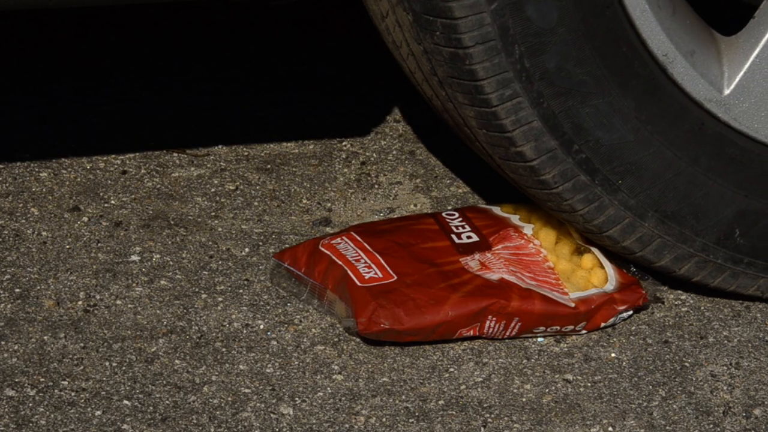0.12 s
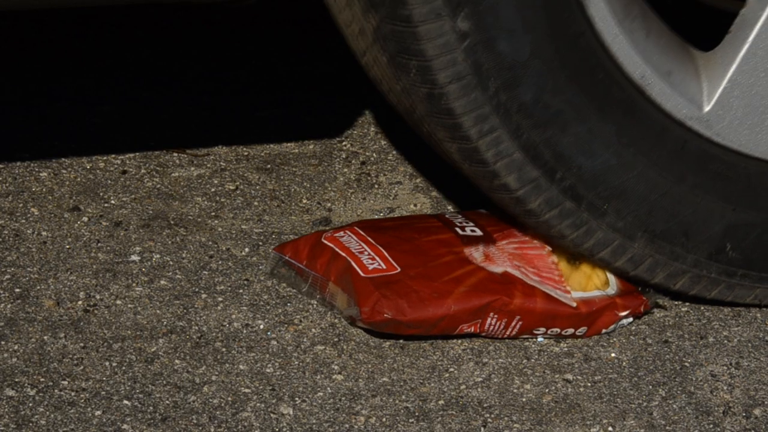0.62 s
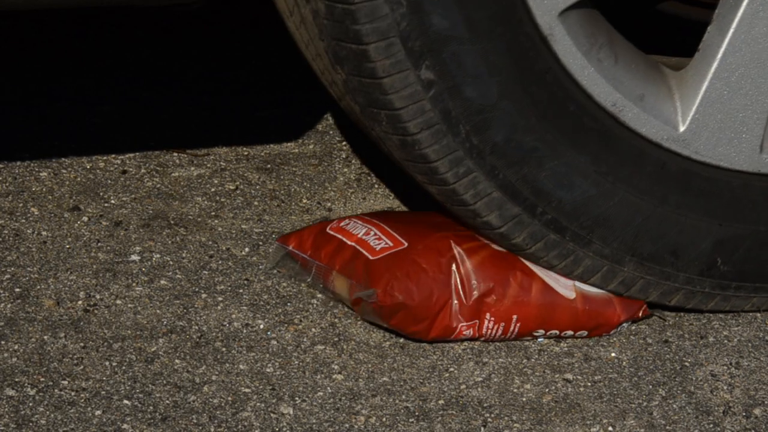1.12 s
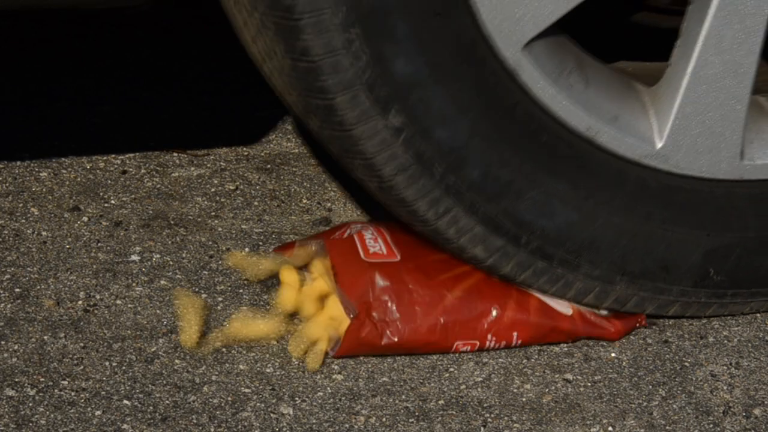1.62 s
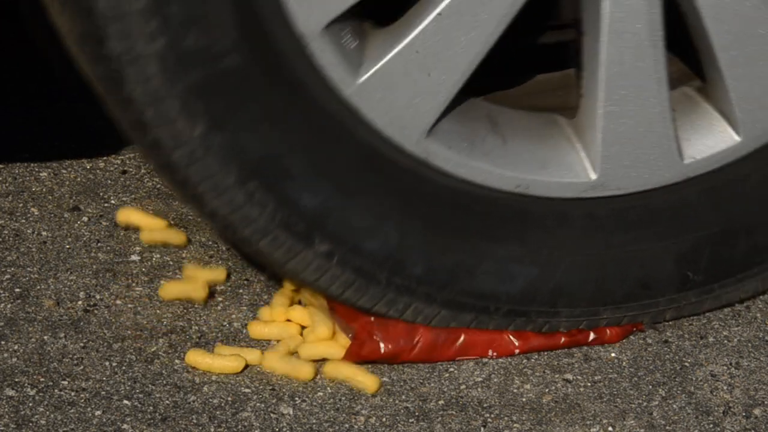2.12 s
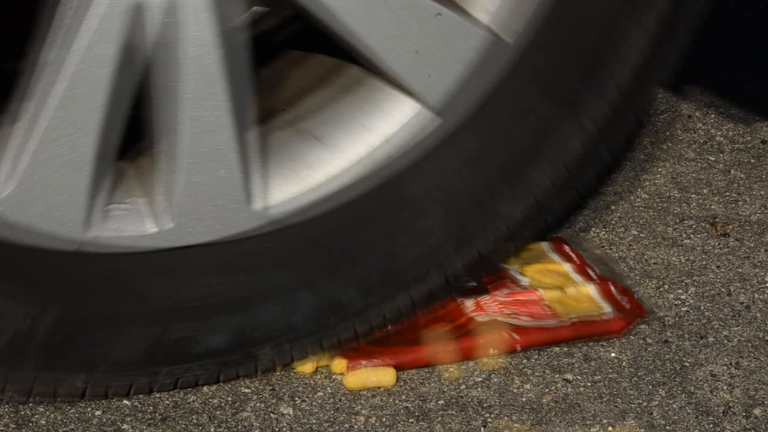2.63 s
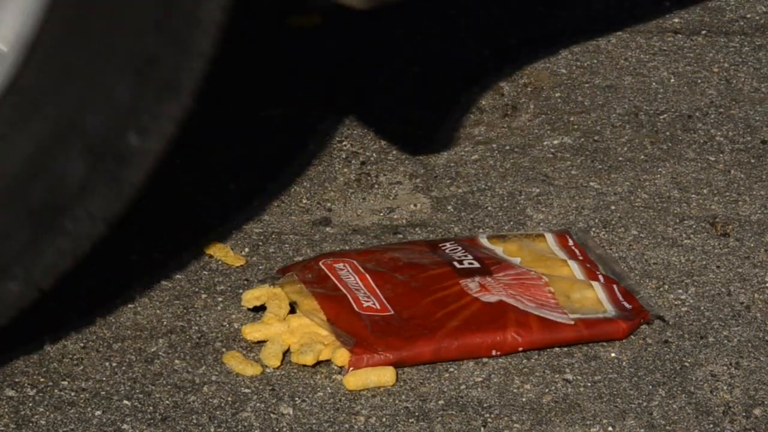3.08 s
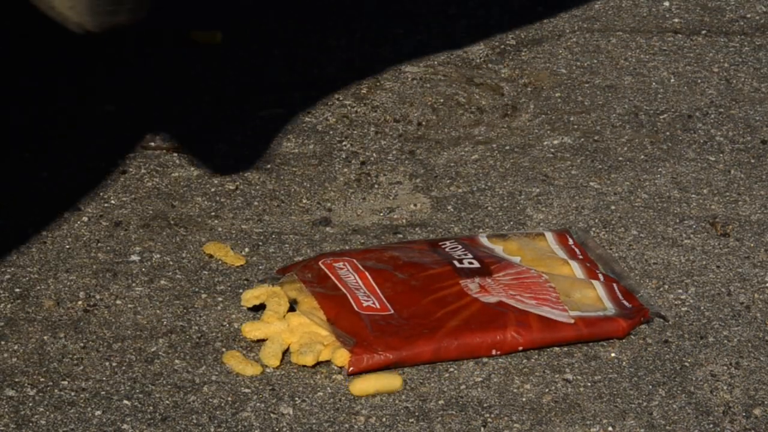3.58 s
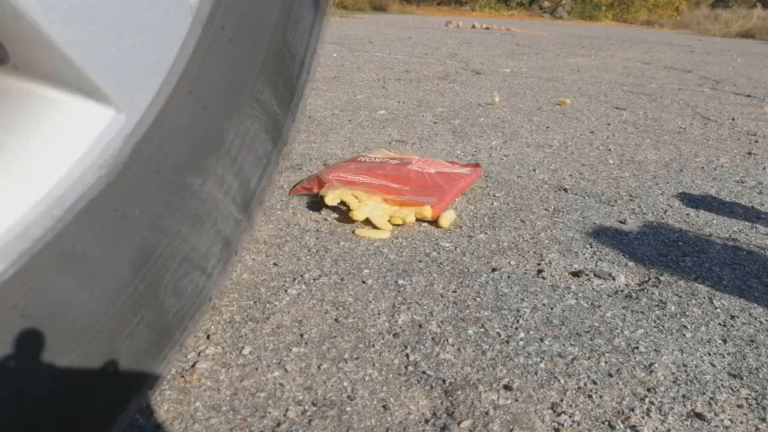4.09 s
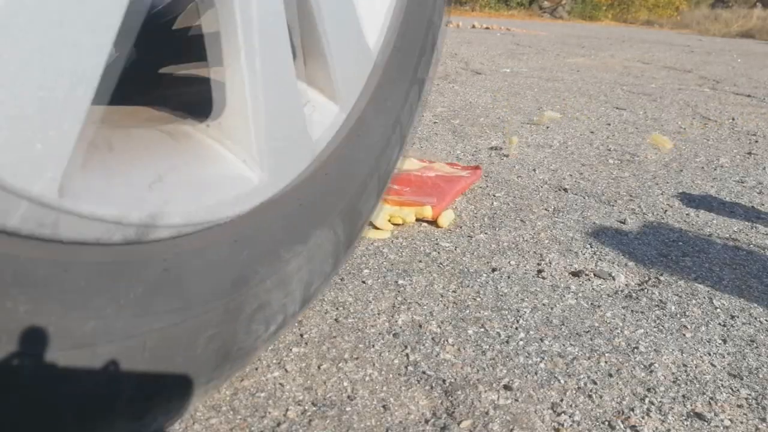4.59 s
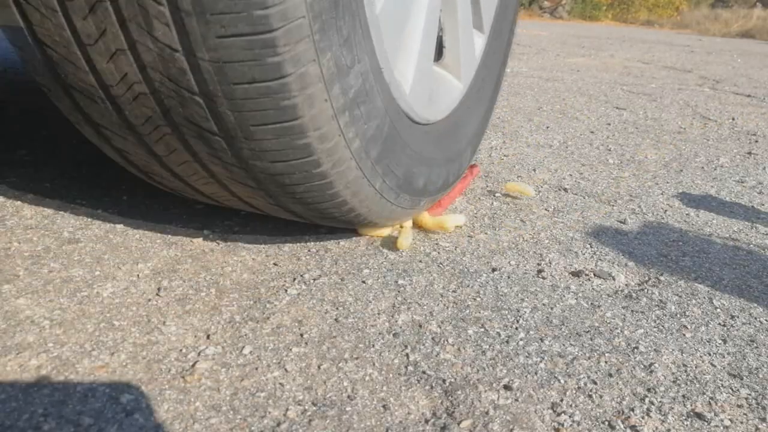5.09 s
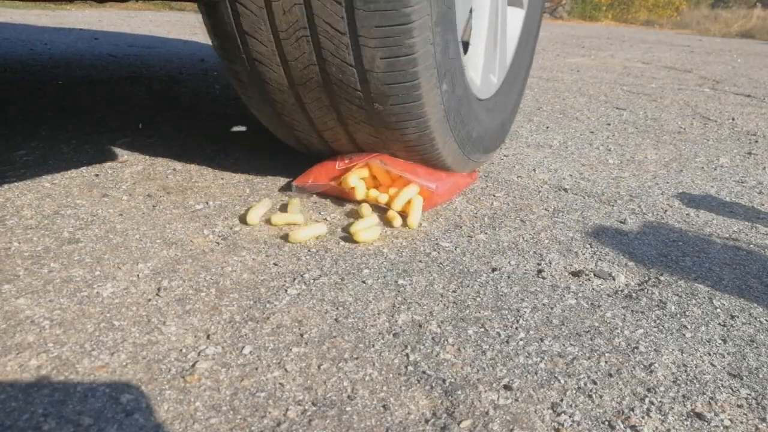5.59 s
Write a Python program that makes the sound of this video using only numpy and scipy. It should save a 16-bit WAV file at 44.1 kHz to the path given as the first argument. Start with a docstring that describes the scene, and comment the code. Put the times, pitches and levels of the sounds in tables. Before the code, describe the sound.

A puttering engine idles while film crinkles and brittle puffs crack under a slow tyre. Wind thumps the close microphone harder and harder, overloading it around the loud bag burst. Thick crunching swells, then fades to scattered snaps and a brief rubber squeak. The sound abruptly switches to a subdued, wider outdoor perspective: rolling rumble, gritty clicks, a weak climbing hum, and renewed fizzing crunch slightly to the left.

```python
"""Tyre crushing a bag of puffed snacks

A car tyre creeps over the bag on asphalt: clumped noise grains crunch, decaying rings snap, a hard ring bursts.
An engine idles nearby as pulsed noise with two whines, and rubber squeaks as short wavering tones.
Gusts of shaped noise and short pulses buffet a close mono microphone until it clips.
A cut then leads to a quieter stereo view from further off, where the tyre reaches the bag again:
partly shared noise makes rumble and crunch, a hum rises and grit ticks."""
import sys
import numpy as np
from scipy import signal
from scipy.fft import rfft, irfft, next_fast_len
from scipy.io import wavfile
from scipy.ndimage import uniform_filter1d, map_coordinates

SR = 44100
rng = np.random.default_rng(int(sys.argv[2]) if len(sys.argv) > 2 else 0)


def bounce(signal):
    """Save signal as a 16-bit WAV file at the path given by the first command-line argument."""
    frames = np.transpose(np.atleast_2d(signal))
    limited = np.clip(frames, -1, 1)
    pcm = np.round(limited * 32767).astype(np.int16)
    wavfile.write(sys.argv[1], SR, pcm)


def volts(x):
    """Linear amplitude factor 10**(x/20) for a level x in dB, scalar or array-like."""
    e = np.asarray(x, float) / 20
    return 10 ** e


N = 251811


def unit(x):
    """Normalisation: scales a signal to rms 1."""
    return x / np.sqrt(np.mean(x ** 2) + 1e-20)


def along(points, hz):
    """Logarithmic frequency scale: reads (frequency [Hz], value) points between their knots."""
    f, v = np.transpose(points)
    return np.interp(np.log(hz + 1), np.log(f + 1), v)


def curves(rows):
    """Linear interpolation: one value per sample for each column after the time."""
    s, *columns = np.transpose(rows)
    return [np.interp(np.arange(N) / SR, s, column) for column in columns]


def wobble(rate):
    """Band-limited fluctuation: a smooth random curve with rate knots a second."""
    knots = rng.standard_normal(int(N * rate / SR) + 4)
    return map_coordinates(knots, [np.arange(N) * rate / SR])


def filtered(x, response):
    """Linear filtering: multiplies the spectrum by a response of frequency."""
    m = next_fast_len(N + 8192)
    return irfft(rfft(x, m) * response(np.fft.rfftfreq(m, 1 / SR)), m)[..., :N]


def coloured(x, spectrum):
    """Spectral shaping: filters by a (frequency [Hz], level [dB]) curve, then scales to rms 1."""
    return unit(filtered(x, lambda hz: volts(along(spectrum, hz))))


def grains(rate, spread_db, hiss):
    """Shot noise: random impulses, rate a second, of widely spread size, over a share of plain noise."""
    hit = rng.random(N) < rate / SR
    size = volts(spread_db * np.minimum(rng.exponential(size=N), 3)) * rng.standard_normal(N)
    return unit(hit * size) + hiss * rng.standard_normal(N)


def clicks(rows, cycles, crack, sharpening):
    """Damped resonance: a ring decaying over a few cycles, under a broad crack and a short rattle."""
    out, t = np.zeros(N + 2048), np.arange(2048) / SR
    for s, db, hz in rows:
        ring = np.sin(2 * np.pi * hz * t) * np.exp(-t * hz / cycles)
        crack_and_rattle = crack * np.exp(-t / 0.00078) + 0.089 * np.exp(-t / 0.0019)
        sharpness = (hz / 4500) ** sharpening  # higher rings get more noise if sharpening > 0
        noise = rng.standard_normal(len(t)) * sharpness * crack_and_rattle
        out[round(s * SR):][:len(t)] += volts(db) * (ring + noise)
    return out[:N]


# Likeness of left and right: (frequency [Hz], correlation [0-1])
LEFT_RIGHT_LIKENESS = [(100, 0.11), (550, 0.44), (1650, 0.21), (5000, 0.17), (15000, .1)]


def two_ports(sources, spectrum):
    """Partial coherence: left and right share part of the sound, less in most of the treble."""
    turn = lambda hz: np.arccos(np.clip(along(LEFT_RIGHT_LIKENESS, hz), -1, 1)) / 2
    shares = lambda hz: np.array([np.cos(turn(hz)), np.sin(turn(hz))])
    mid, side = filtered(np.array(sources), shares)
    return coloured(np.array([mid + side, mid - side]), spectrum)


# Far layers before panning: (time [s], rumble level [dB], tyre crunch level [dB], fizz level [dB])
FAR_LEVELS = [(4.17, -48, -58.5, -67), (4.55, -56, -61, -67), (4.75, -52.5, -57, -63),
              (5.15, -50.5, -56, -60.5), (5.2, -52.5, -53, -48), (5.38, -51.5, -42.5, -47),
              (5.5, -51.5, -40.5, -47.5), (5.71, -53, -42, -50.5)]
# Hum before panning: (time [s], frequency [Hz], level [dB])
FAR_HUM_TRACK = [(4.68, 410, -86), (4.78, 430, -62), (5.03, 488, -60.5), (5.35, 611, -61)]
# Ticks of grit before filter and panning: (time [s], level [dB], ring frequency [Hz])
GRIT_TICKS = [(4.261, -43, 736), (4.389, -35, 2493), (4.411, -38, 750), (4.672, -32.5, 1282),
              (4.701, -32.5, 1200), (4.708, -36.5, 1010), (4.722, -34.5, 900), (4.743, -35.5, 1000),
              (4.876, -46.5, 823), (4.918, -34.5, 1625), (4.979, -39, 791), (5.097, -33.5, 2930),
              (5.187, -35.5, 840)]
# Spectral shapes of the far layers: (frequency [Hz], relative level [dB])
FAR_RUMBLE_SHAPE = [(15, -40), (30, 2.5), (85, 3), (170, -1.5), (240, -7.5), (330, -24), (700, -88.5)]
FAR_CRUNCH_SHAPE = [(150, -36), (250, -9), (450, -4), (1900, -4.5), (3500, -10.5), (9000, -46.5)]
FAR_FIZZ_SHAPE = [(1500, -30), (4000, -6), (8300, -10.5), (10700, -9), (14800, -22), (15400, -62.5)]


def far_view():
    """Stereo level difference: rumble, rising hum, tyre crunch and grit sit a little to the left."""
    rumble_db, crunch_db, fizz_db = curves(FAR_LEVELS)
    hum_hz, hum_db = curves(FAR_HUM_TRACK)
    rumble_noise = rng.standard_normal((2, N))
    rumble = volts(rumble_db + 2.4 * wobble(30)) * two_ports(rumble_noise, FAR_RUMBLE_SHAPE)
    grit = lambda: [grains(1500, spread_db=2, hiss=1.0) for _ in range(2)]
    tyre = volts(crunch_db + 1.33 * wobble(60)) * two_ports(grit(), FAR_CRUNCH_SHAPE)
    fizz = volts(fizz_db + 0.8 * wobble(60)) * two_ports(grit(), FAR_FIZZ_SHAPE)
    hum_phase = 2 * np.pi * np.cumsum(hum_hz + 19 * wobble(90)) / SR
    hum = volts(hum_db + 3.5 * wobble(30)) * np.sin(hum_phase)
    # faint grit pricks all along
    pricks = volts(-69.5) * coloured(grains(90, spread_db=-1.0, hiss=0), FAR_FIZZ_SHAPE)
    ticks = clicks(GRIT_TICKS, cycles=1.0, crack=0.4, sharpening=0) + pricks
    ticks = filtered(ticks, lambda hz: 1 / (1 + (hz / 11500) ** 4))
    ticks = np.array([np.roll(ticks, 11), ticks])  # the left is 11 samples later
    return volts([[.7], [-.7]]) * (rumble + tyre + fizz + hum) + volts([[1.8], [-2.6]]) * ticks


# Spectral shape of the engine clatter: (frequency [Hz], relative level [dB])
CLATTER_SHAPE = [(250, -37.5), (430, -8), (1400, -12.5), (2100, -9), (5000, -21), (7600, -18.5),
                 (10500, -30), (15000, -53.5)]
FIRING_HZ, FIRST_FIRING_S = 30.93, 0.019
WHINE_HZ, WHINE_CREEP_HZ_PER_S, WHINE_DB = 1604, 36, -46.5  # rises as the car creeps
UPPER_WHINE_HZ, UPPER_WHINE_DB, UPPER_FADE_DB_PER_S = 2640, -52.5, 5


def whine(hz):
    """Frequency modulation: a narrow tone of unsteady pitch and level."""
    phase = 2 * np.pi * np.cumsum(hz + 45 * wobble(120)) / SR
    return volts(4 * wobble(45)) * np.sin(phase)


def engine():
    """Amplitude modulation: a puff of noise a firing, fading as the car creeps on, and two whines."""
    t = np.arange(N) / SR
    firing = 0.5 + 0.5 * np.cos(2 * np.pi * FIRING_HZ * (t - FIRST_FIRING_S))
    beat = (0.4 + firing ** 1.18) * volts(1.1 * wobble(25))
    clatter = volts(-42.0 - 0.77 * t) * coloured(beat * rng.standard_normal(N), CLATTER_SHAPE)
    lower = volts(WHINE_DB) * whine(WHINE_HZ + WHINE_CREEP_HZ_PER_S * t)
    upper = volts(UPPER_WHINE_DB - UPPER_FADE_DB_PER_S * t) * whine(UPPER_WHINE_HZ)
    return clatter + lower + upper


# Gusts: (time at full strength [s], time held [s], wind strength [dB])
GUST_EVENTS = [(0.029, 0.044, -26.5), (0.295, 0.041, -21), (0.497, 0.025, -25), (0.537, 0.016, -18.5),
               (0.815, 0.068, -21), (0.929, 0.026, -18.5), (1.038, 0.039, -15.5), (1.15, 0.026, -21),
               (1.252, 0.11, -19.5), (1.357, 0.062, -13.5), (1.761, 0.03, -5.5), (1.84, 0.03, -11.5),
               (1.961, 0.076, -9.5), (2.076, 0.1, -13.5), (2.335, 0.14, -11), (2.6, 0.1, -18),
               (2.745, 0.06, -18), (2.91, 0.12, -21.5), (3.124, 0.036, -17.5), (3.33, 0.066, -16.5),
               (3.53, 0.039, -18.5), (3.83, 0.024, -31), (4.039, 0.036, -27)]
# Buffeting between gusts: (time [s], wind strength [dB])
BREEZE_STRENGTH = [(0, -51), (0.45, -41), (0.75, -33), (1.2, -32.5), (1.5, -14), (1.72, -11), (2.15, -18),
                   (2.3, -16), (2.7, -20.5), (3.1, -25.5), (3.21, -31), (3.33, -18), (3.6, -17.5),
                   (3.76, -34), (3.93, -41), (4.17, -43)]
GUST_RISE_DB_PER_S, GUST_FALL_DB_PER_S = 800, 400


def buffeting():
    """Exponential growth and decay: every gust rises, holds and dies away alike above the breeze, in dB."""
    t = np.arange(N) / SR
    strengths = curves(BREEZE_STRENGTH)
    for s, held, db in GUST_EVENTS:
        rise = GUST_RISE_DB_PER_S * np.maximum(s - t, 0)
        fall = GUST_FALL_DB_PER_S * np.maximum(t - s - held, 0)
        strengths.append(db - rise - fall)
    return np.max(strengths, axis=0)


# Single big eddies: (time [s], level [dB], frequency [Hz])
EDDY_THUMPS = [(0.519, -8.5, 246), (0.5398, -5.5, 674), (0.955, -9.5, 250), (0.985, -6, 232),
               (1.039, -3, 560), (1.058, -0.5, 420), (1.153, -6.5, 406), (1.377, -3.5, 400),
               (1.39, -3, 380), (1.61, -2, 330), (1.926, -2, 330), (1.96, -1, 300), (1.974, -3.5, 640),
               (1.999, 14.5, 400), (2.079, -10, 520), (2.125, -0.5, 600), (2.456, 4, 604),
               (2.717, -5.5, 450), (2.772, -3, 400), (2.806, 0, 352), (2.918, -5.5, 487), (2.964, -21, 405),
               (3.147, -3.5, 480), (3.533, -4, 450)]


def thumps():
    """Pressure pulse: a big eddy pushes the diaphragm for a cycle or two, mostly inwards."""
    out, t = np.zeros(N), np.arange(-600, 600) / SR
    for s, db, hz in EDDY_THUMPS:
        swing = np.cos(2 * np.pi * hz * t + rng.normal(0, 0.6))
        push = swing * np.exp(-np.abs(t * hz / 0.55) ** 1.3)
        direction = np.sign(rng.random() - 0.2)
        out[round(s * SR) - 600:][:len(t)] += direction * volts(db) * push
    return out


# Spectral shapes of the wind's eddies by size: (frequency [Hz], relative level [dB])
BIG_EDDY_SHAPE = [(59, -44.5), (100, -8.5), (155, 3), (310, 1.5), (700, -15.5), (910, -25.5), (1540, -120)]
SMALL_EDDY_SHAPE = [(150, -56), (400, -1.5), (650, -2), (1000, -4.5), (1600, -17.5), (4000, -78)]
SLOW_EDDY_SHAPE = [(15, -54.5), (40, -9.5), (70, -1.5), (110, 2), (170, -7), (500, -84.5)]


def wind():
    """Turbulence: eddies thump the microphone in clumps; stronger gusts add small, higher ones."""
    buffet_db = buffeting()
    clumps = volts(2.2 * wobble(40) + 2.5 * wobble(100))
    eddies = clumps * grains(800, spread_db=2.5, hiss=0.6)
    stream = coloured(eddies, BIG_EDDY_SHAPE)
    swell = np.sqrt(np.abs(uniform_filter1d(stream ** 2, SR // 30)) + 0.05)
    big = volts(buffet_db) * unit(stream / swell ** 0.7)  # the division evens out the clumps
    small_db = 1.715 * buffet_db + 2.5 * wobble(30)
    small = volts(small_db) * coloured(eddies / swell, SMALL_EDDY_SHAPE)
    lagging_db = uniform_filter1d(buffet_db, SR // 12)  # the largest eddies follow the gusts sluggishly
    slow = volts(0.54 * lagging_db - 16.5) * coloured(rng.standard_normal(N), SLOW_EDDY_SHAPE)
    return big + small + slow + thumps()


# Rubber slips: (start [s], length [s], frequency [Hz], mean level [dB], phase unsteadiness [rad])
RUBBER_SLIPS = [(3.412, .048, 8850, -46, 0.699), (3.598, 0.023, 2270, -31.5, 3.5)]


def squeaks():
    """Stick-slip friction: brief narrow whistles of rubber slipping."""
    t, out = np.arange(N) / SR, np.zeros(N)
    for s, length, hz, db, rough in RUBBER_SLIPS:
        fade = np.clip(np.minimum(t - s, s + length - t) / 0.0045, 0, 1)
        tone = np.sin(2 * np.pi * hz * t + rough * wobble(300))
        out += volts(db + 3.4 * wobble(150)) * fade * tone
    return out


# Crushing: (time [s], crunch level [dB], film rustle above crunch [dB])
CRUNCH_LEVELS = [(0, -46.5, -15.5), (0.65, -44, -6), (1.04, -38, -10.5), (1.23, -35, -8.5), (1.26, -30, -7),
                 (1.42, -29, -8), (1.53, -30, -5), (1.545, -34, -9.5), (1.75, -33, -10), (2.05, -28, -8),
                 (2.25, -24, -5.5), (2.42, -25, -6), (2.58, -30, -1), (2.62, -36, -7.5), (2.98, -40, -9),
                 (3.04, -32.5, -9), (3.3, -43, -8), (3.7, -41.5, -12.5), (4.17, -43.5, -12)]
# Spectral shapes of puffs and film: (frequency [Hz], relative level [dB])
PUFF_SHAPE = [(200, -51), (500, -13), (1300, -3.5), (3200, -9.5), (5000, -13.5), (6500, -20),
              (10000, -71.5)]
FILM_SHAPE = [(3000, -66.5), (6200, -6.5), (8500, -1), (9500, -5), (11000, -15), (13400, -18), (15600, -29)]


def crunch():
    """Brittle fracture: puffs shatter and film crinkles in dense clumped grains, with sparser cracks in both."""
    crunch_db, film_db = curves(CRUNCH_LEVELS)
    clumps = volts(0.6 * wobble(30) + 1.9 * wobble(200))
    crack_share = np.clip((-16.5 - crunch_db) / 14, 0, 1)  # drowned when the crushing is densest
    cracks = crack_share * grains(260, spread_db=2.5, hiss=0)
    puff_grains = 0.74 * cracks + grains(2500, spread_db=4.0, hiss=0.95)
    film_grains = 0.66 * cracks + grains(1300, spread_db=2.5, hiss=0.99)
    puffs = coloured(clumps * puff_grains, PUFF_SHAPE)
    film = coloured(clumps * film_grains, FILM_SHAPE)
    return volts(crunch_db) * (volts(2.5) * puffs + volts(film_db) * film)


# Single breaks before filtering: (time [s], level [dB], ring frequency [Hz])
SINGLE_BREAKS = [(0.8718, -19, 2860), (0.9197, -16.5, 2660), (1.1184, -18, 2850), (1.1441, -16.5, 3960),
                 (1.2075, -22, 8500), (1.2524, -14.5, 2480), (1.295, -11.5, 2640), (1.3298, -9.5, 4130),
                 (1.3995, -12, 3040), (1.4575, -20, 8450), (1.5005, -15.5, 7500), (1.5187, -9.5, 4200),
                 (1.5692, -20.5, 8000), (1.5895, -22, 8500), (1.601, -21, 8500), (1.6495, -4, 2560),
                 (1.6836, 4.5, 2580), (1.7024, -6.5, 3835), (1.7876, -14.5, 2600), (2.1885, -13.5, 8350),
                 (2.393, -15.5, 4500), (2.5656, -16, 8400), (2.655, -15, 2660), (2.79, -19.5, 7900),
                 (3.013, -18, 8260), (3.023, -14.5, 2420), (3.0486, -10.5, 8300), (3.0553, -13.5, 8000),
                 (3.0844, -15, 8500), (3.118, -23.5, 8500), (3.18, -24, 8300), (3.202, -28.5, 8000),
                 (3.3655, -20.5, 8500), (3.5884, -15.5, 2770), (3.6952, -21, 2570), (3.8275, -17, 3650),
                 (3.8345, -17, 3680), (3.879, -20, 3240), (3.8892, -14.5, 1580), (3.8945, -12.5, 2720),
                 (3.9185, -22, 3300)]


def snaps():
    """Impulsive excitation: the loudest single breaks of puffs, film and grit ring briefly."""
    breaks = clicks(SINGLE_BREAKS, cycles=2.8, crack=0.6, sharpening=1.2)
    return filtered(breaks, lambda hz: hz / (hz + 900) / (1 + (hz / 11000) ** 6))


# Bag seam: (time [s], time held [s], starting level [dB], air frequency [Hz], 60 dB decay [s], hiss share)
SEAM_BURSTS = [(1.6735, 0.025, 15, 606, 0.078, 0.26), (1.697, 0.012, 0.5, 426, 0.17, 0.14)]


def burst():
    """Air resonance: the seam gives, trapped air rings hard while it tears and escapes with a hiss."""
    out, t = np.zeros(N), np.arange(SR // 4) / SR
    for s, held, db, hz, t60, hiss in SEAM_BURSTS:
        drift = np.cumsum(0.12 * rng.standard_normal(len(t)))  # the shrinking bag holds no steady pitch
        air = -np.sin(2 * np.pi * hz * t + drift) + hiss * rng.standard_normal(len(t))
        level_db = db - 60 * t / t60 - 1300 * np.maximum(t - held, 0)
        out[round(s * SR):][:len(t)] += volts(level_db) * air
    return filtered(out, lambda hz: 1 / np.sqrt(1 + (hz / 8000) ** 6))


# Close microphone housing: (frequency [Hz], width [Hz], depth [0-1])
HOUSING_NOTCHES = [(5710, 310, 0.87), (6840, 200, 0.6)]


def close_microphone(x):
    """Saturation: after two dips from the housing the preamp clips and its top end rolls off."""
    dip = lambda hz, c, w, d: 1 - np.clip(d, 0, 1) / (1 + (2 * (hz - c) / w) ** 2)
    housing = lambda hz: np.prod([dip(hz, *row) for row in HOUSING_NOTCHES], axis=0)
    x = np.clip(filtered(x, housing), -30, 30)
    clipped = x / (1 + np.abs(x) ** 7) ** (1 / 7)
    return np.clip(filtered(clipped, lambda hz: 1 / np.sqrt(1 + (hz / 14500) ** 8)), -1, 1)


CUT_S = 4.165


def scene():
    """Superposition: the close sources add at one microphone, then a 4.2 ms crossfade cuts to the far view."""
    near = close_microphone(engine() + wind() + squeaks() + crunch() + snaps() + burst())
    after_cut = np.clip((np.arange(N) / SR - CUT_S) / 0.0042, 0, 1)
    return (1 - after_cut) * near + after_cut * far_view()


def top_cut(x):
    """Nothing passes above the cut-off."""
    return signal.sosfilt(signal.butter(12, 15660, fs=SR, output="sos"), x)


def record(dry):
    """Signal chain: the finished mix passes on at its own level."""
    return top_cut(dry)


dry = scene()
out = record(dry)
bounce(out)
```